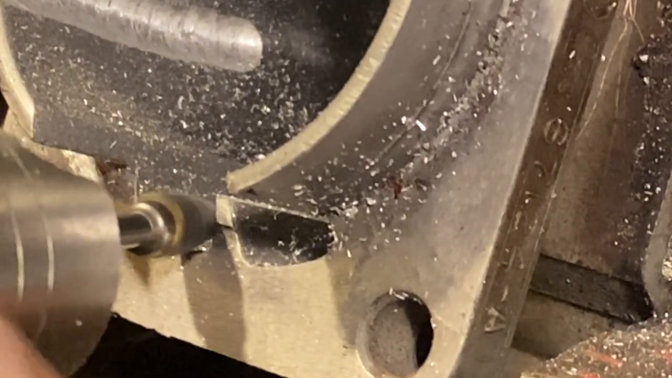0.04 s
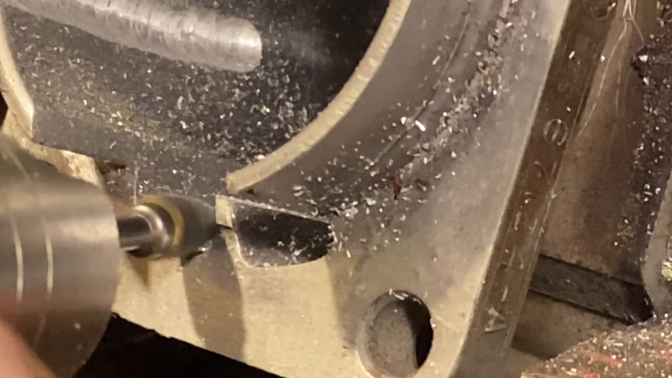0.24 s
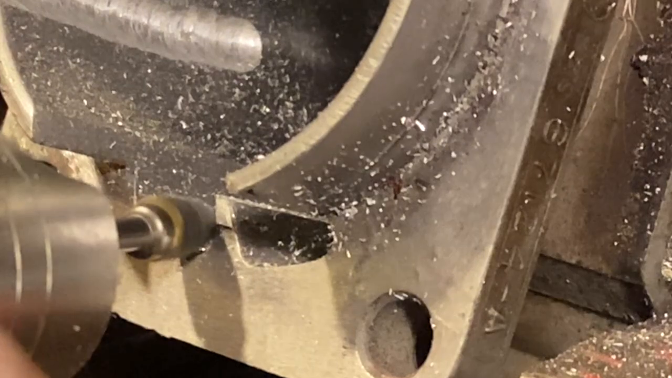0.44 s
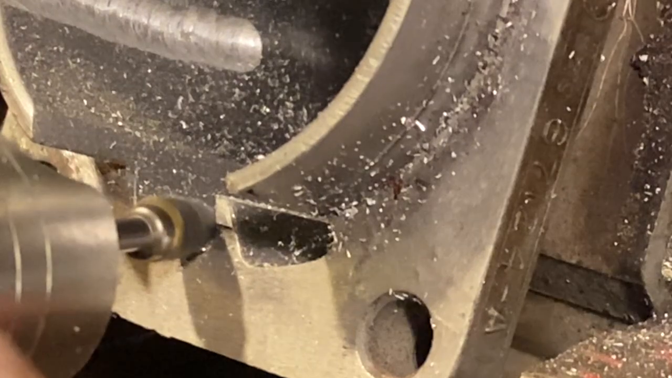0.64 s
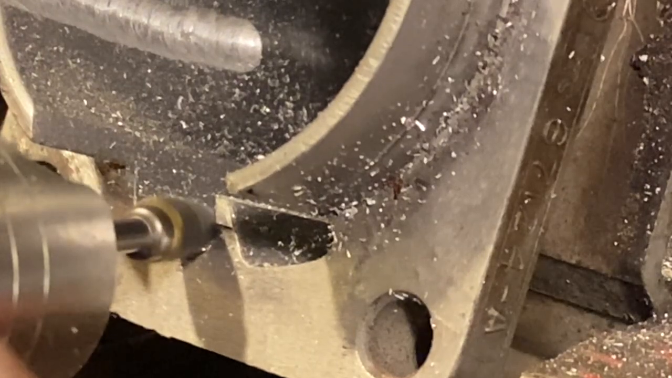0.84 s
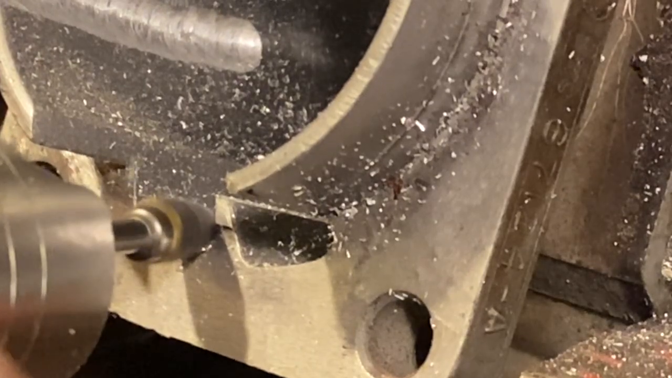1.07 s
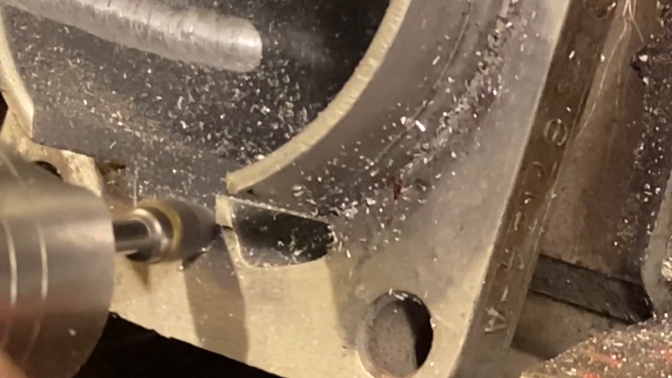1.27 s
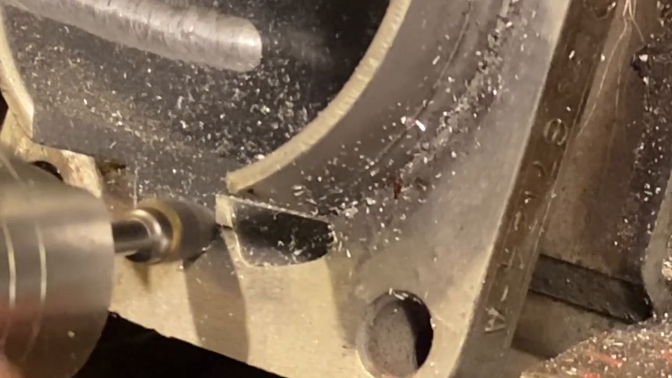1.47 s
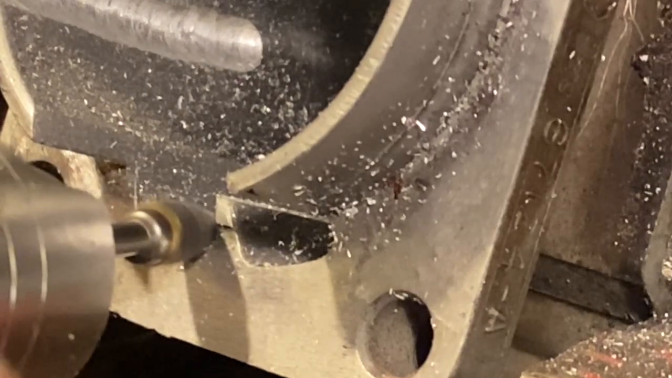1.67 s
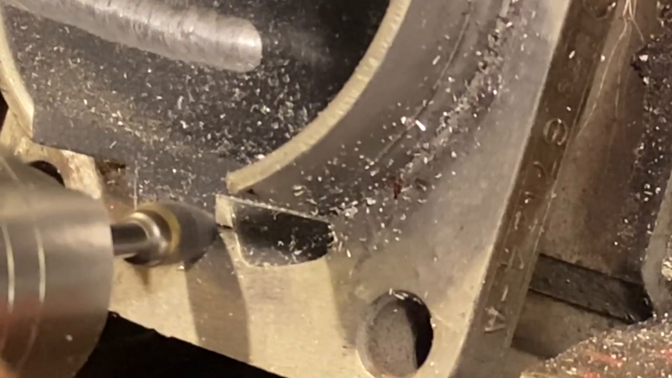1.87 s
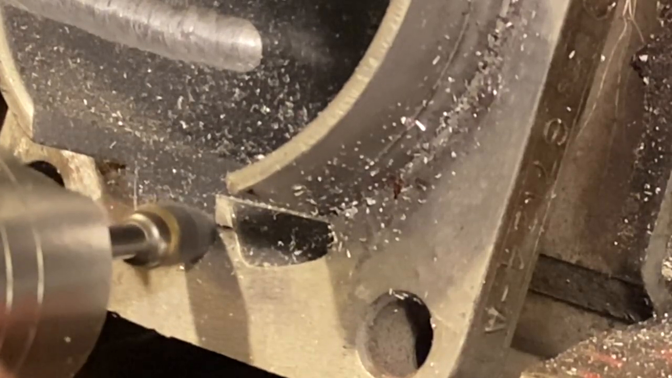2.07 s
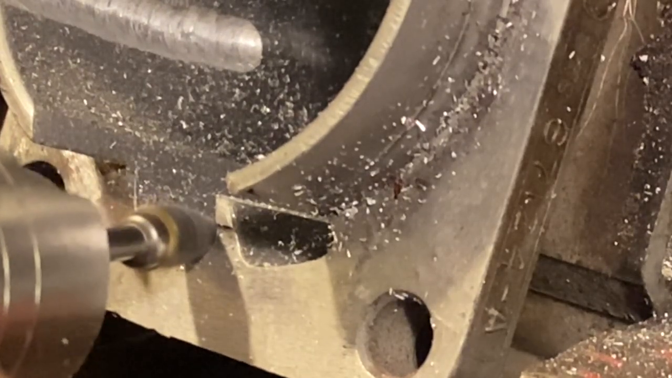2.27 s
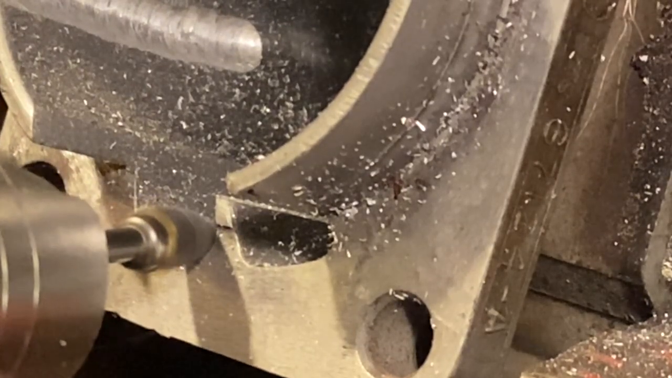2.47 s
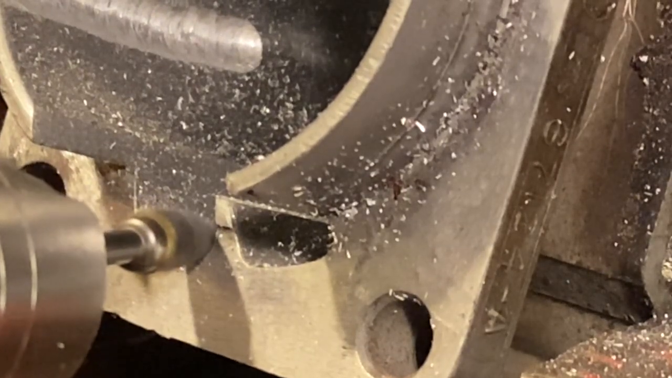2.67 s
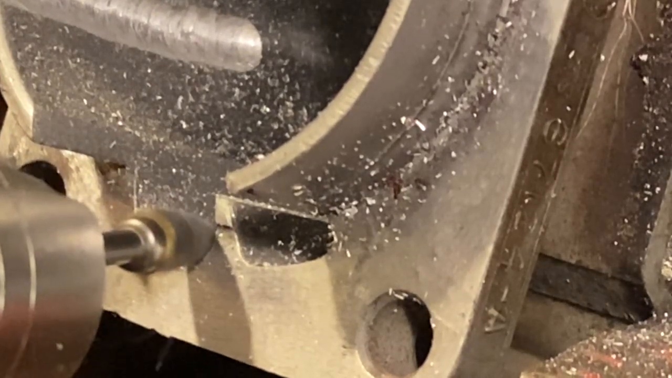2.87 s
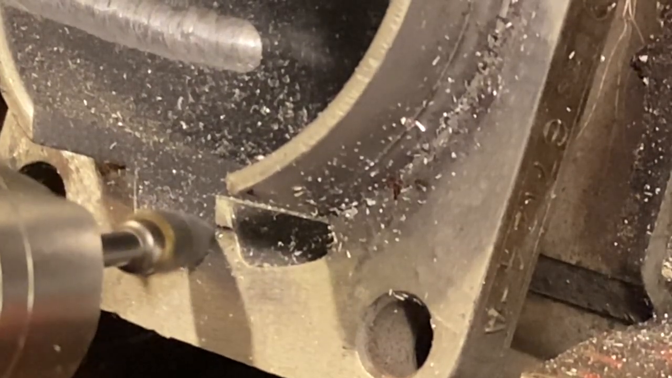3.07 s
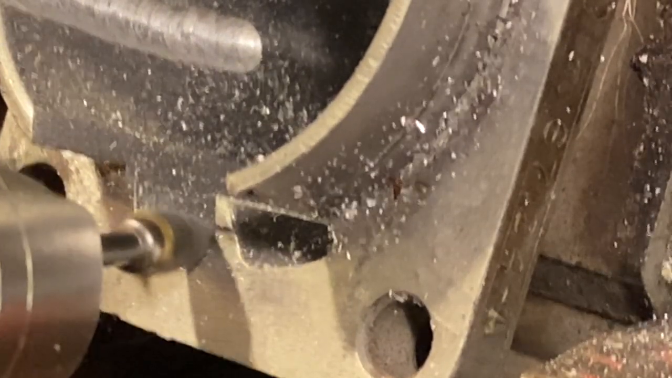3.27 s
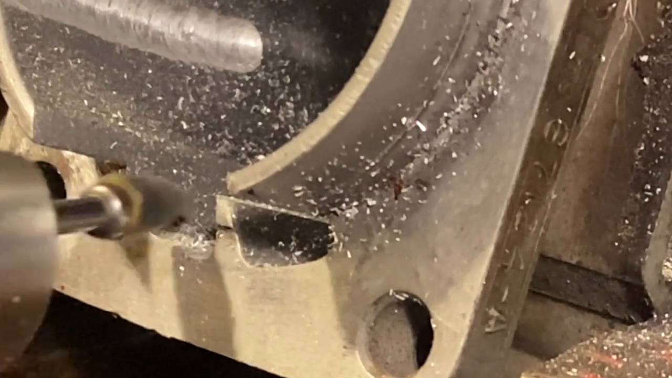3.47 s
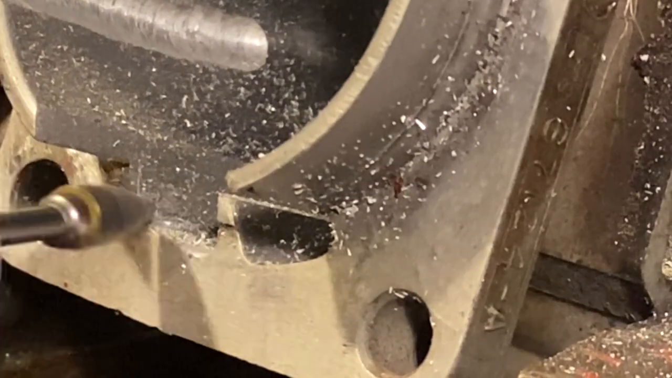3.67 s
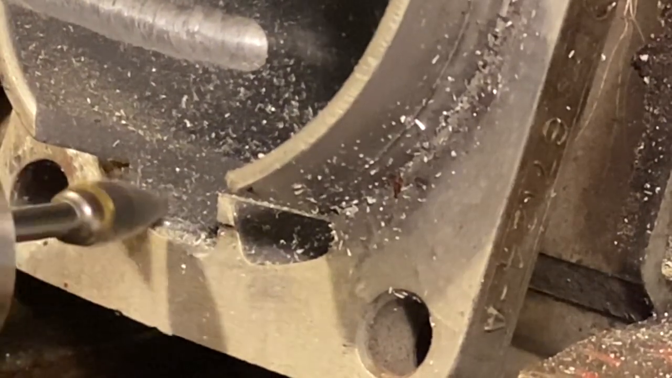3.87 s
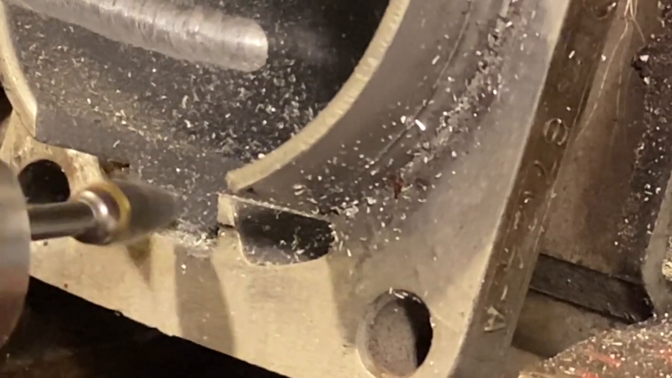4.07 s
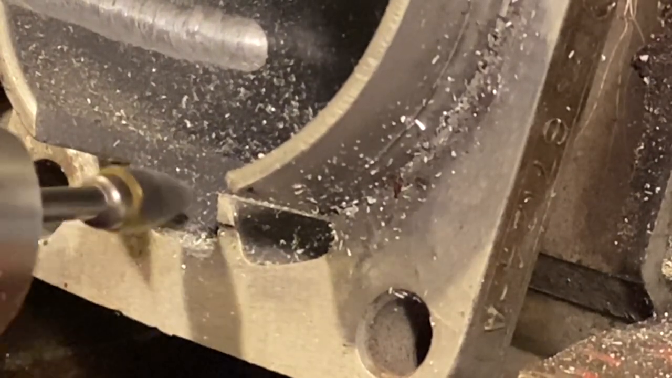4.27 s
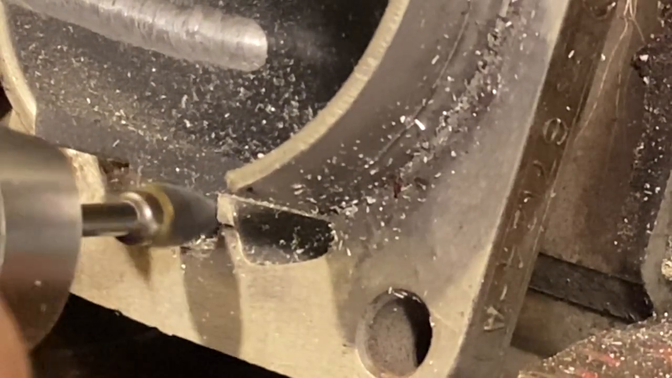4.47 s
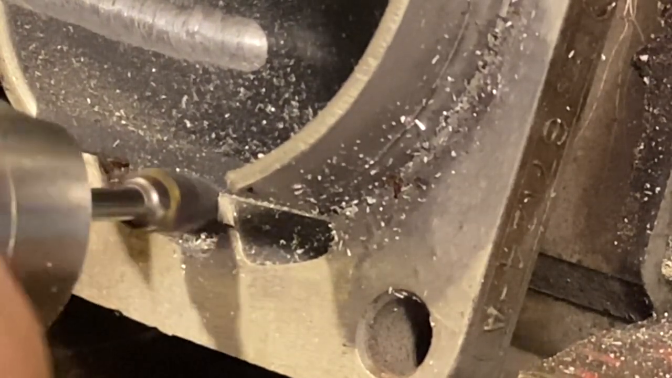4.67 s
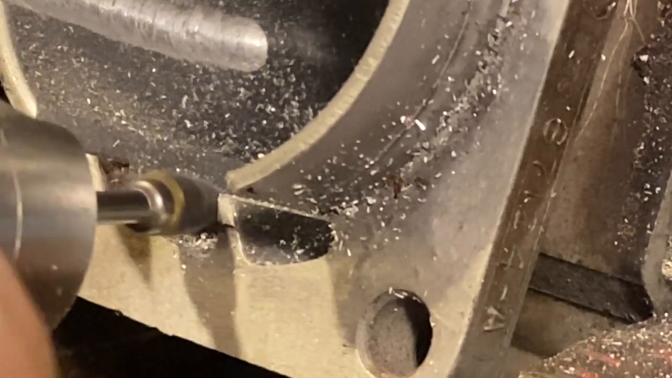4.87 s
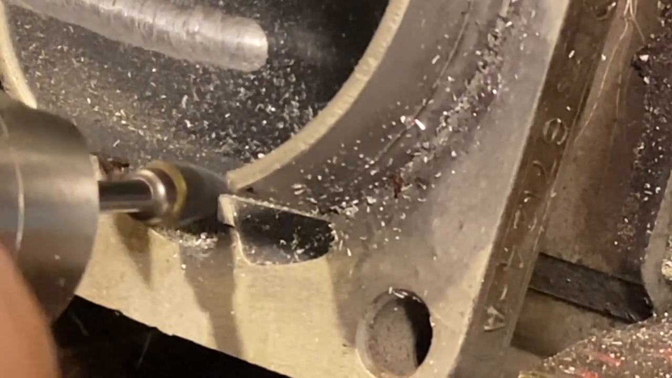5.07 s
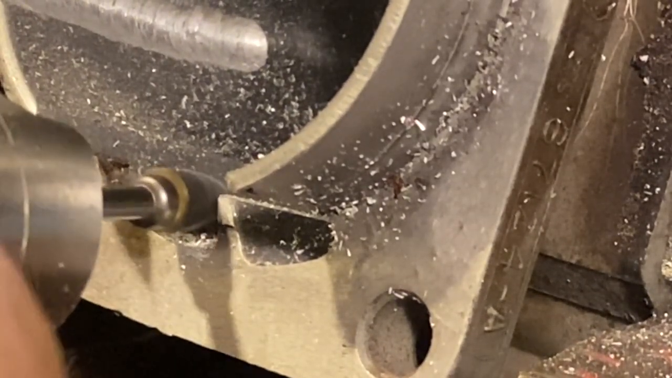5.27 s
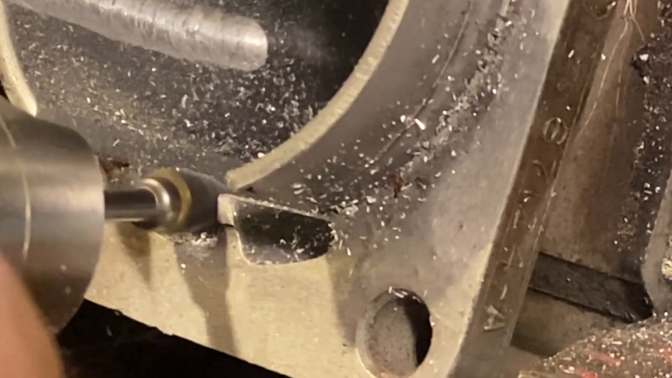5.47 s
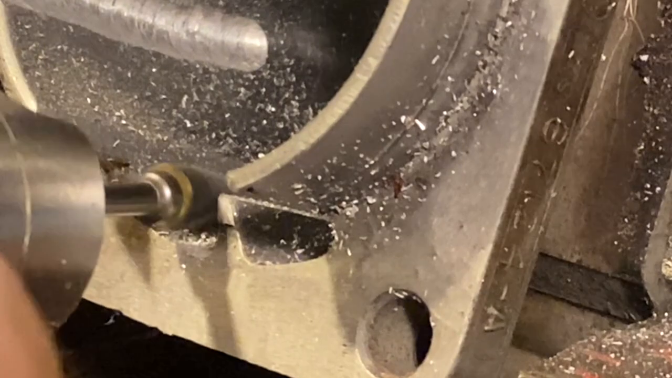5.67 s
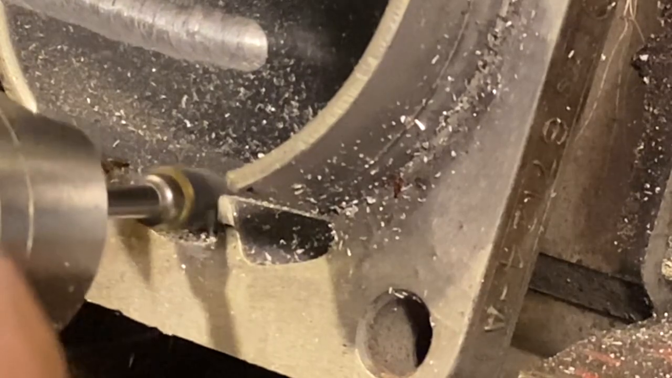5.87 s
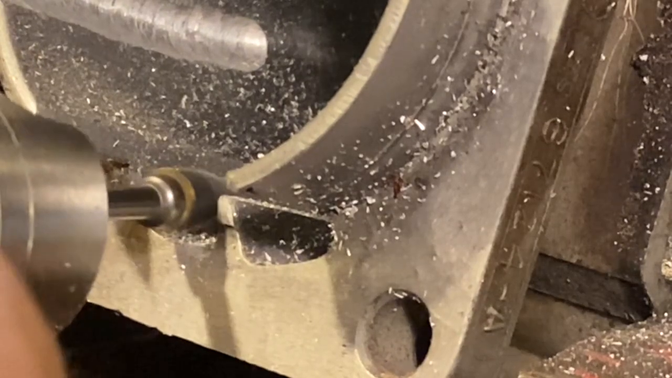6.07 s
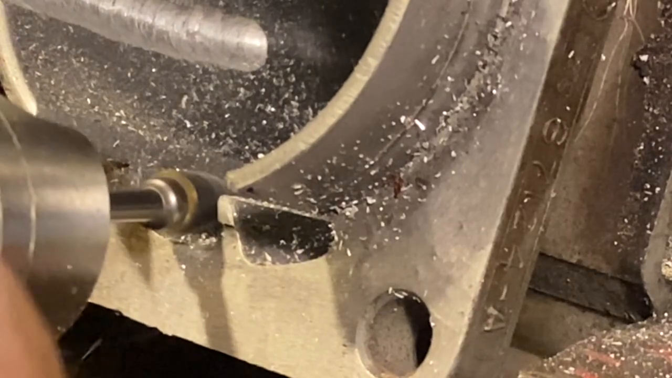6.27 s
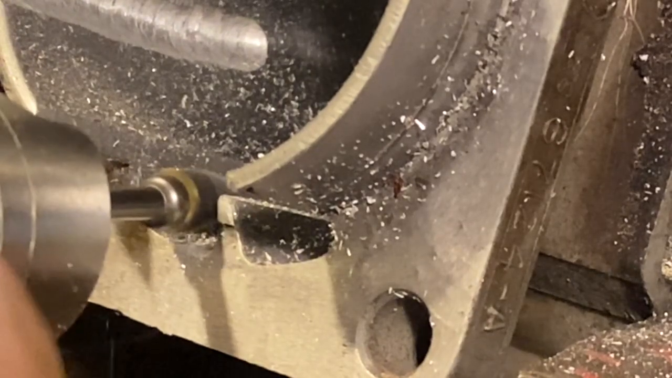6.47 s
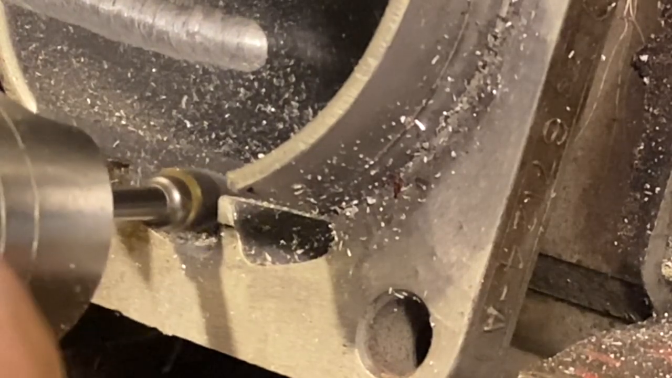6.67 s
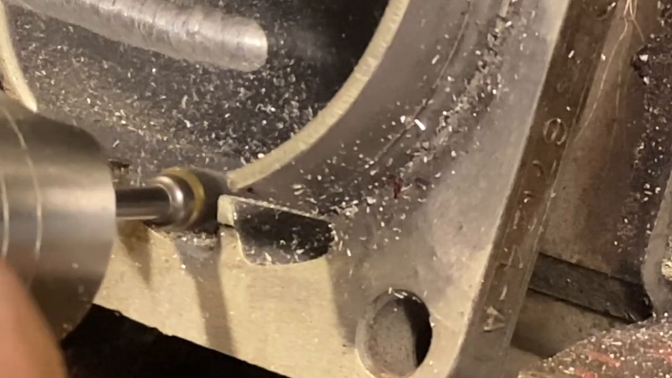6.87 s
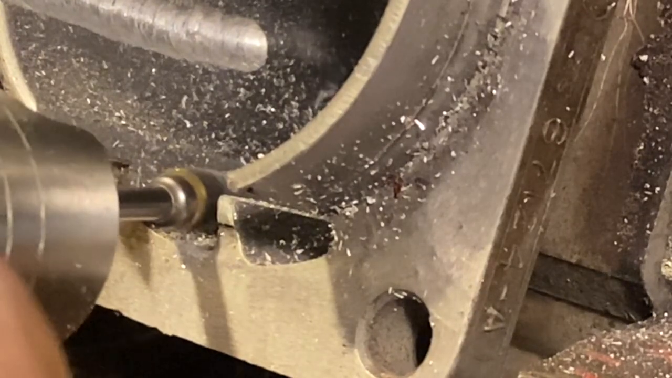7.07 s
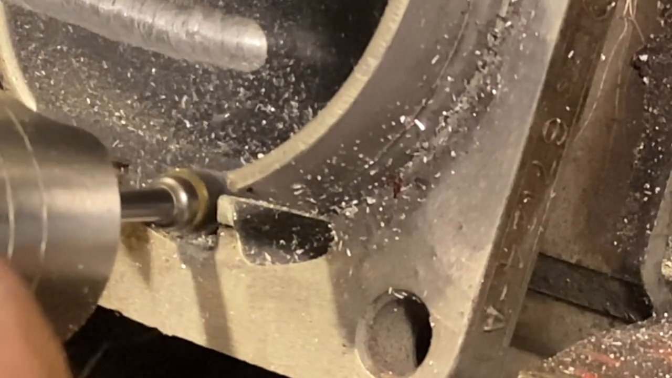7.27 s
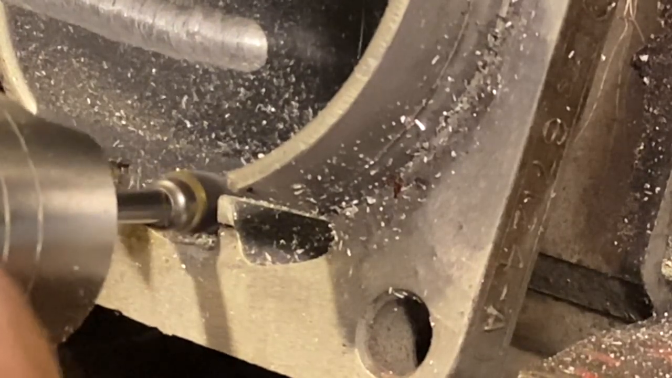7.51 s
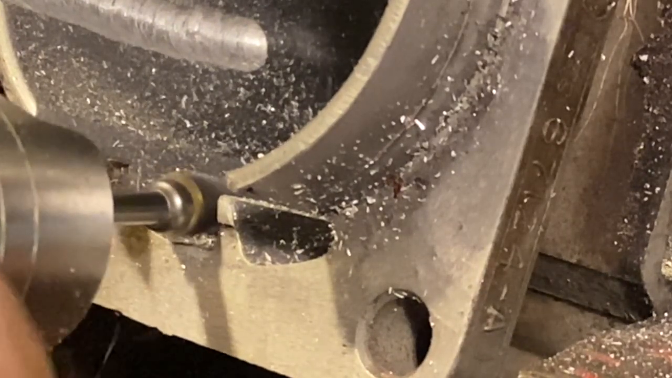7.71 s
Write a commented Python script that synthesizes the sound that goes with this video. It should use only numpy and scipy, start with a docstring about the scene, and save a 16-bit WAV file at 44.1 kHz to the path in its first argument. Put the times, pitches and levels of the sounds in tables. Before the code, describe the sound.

Close up, a small electric grinder's spinning burr cuts a metal casting with a harsh, rough, ringing buzz. After three seconds it lifts off, leaving the motor's airy whirr and steady whine over a low hum. A lighter, uneven touch follows, then a full second cut. Faint workshop rumble lies beneath. Close stereo microphones, little room.

```python
"""A harsh, ringing grind on metal; it stops for a free-running whirr, then a light touch and a second cut. An
electric die grinder cuts a casting: once a turn the off-centre burr strikes, ringing shank and casting.
Brushes, bearings and fan give pulsing filtered noise, shaft orders give tones, unbalance gives the hum. A low
workshop rumble and mains hum lie beneath; left and right differ in phase and balance by band."""
import sys
import numpy as np
from scipy import signal
from scipy.fft import rfft, irfft
from scipy.io import wavfile
from scipy.ndimage import uniform_filter1d

SR = 44100
rng = np.random.default_rng(int(sys.argv[2]) if len(sys.argv) > 2 else 0)


def master_out(mix):
    """Clip the mix to full scale and print it as 16-bit PCM to the path in sys.argv[1]."""
    frames = np.transpose(np.atleast_2d(mix))
    ceiling = np.clip(frames, -1, 1)
    pcm = np.round(ceiling * 32767).astype(np.int16)
    wavfile.write(sys.argv[1], SR, pcm)


N = 341334
T = np.arange(N) / SR

# Shaft speed, lower under load. Each row: time in seconds, speed in turns per second.
SHAFT_SPEED = [(0, 350), (1, 350.3), (1.5, 349.8), (3.3, 349.4), (3.8, 351.2), (4.4, 353.1), (4.8, 353.4),
               (7.74, 353.3)]
# Weakening of every second strike as the burr bounces. Each row: time in seconds, share 0-1.
BOUNCE_SHARE = [(0, 0.52), (.5, 0.57), (.8, 0.46), (3.3, 0.17), (4.7, 0.23), (5.3, 0.71), (7.74, 0.67)]
# Teeth that catch hard. Each row: time in seconds, level in dB over the running force.
TOOTH_CATCHES = [(0.567, 33), (.748, 29), (1.02, 31.5), (1.068, 32), (1.418, 27), (1.956, 31), (2.527, 26),
                 (2.812, 37.5), (2.99, 34), (3.034, 33), (4.814, 40), (5.247, 34), (6.165, 32), (6.853, 33),
                 (7.222, 28), (7.332, 33), (7.644, 27), (7.679, 37)]
# Broad response of the casting. Each row: frequency in Hz, then density in dB per Hz (relative)
# in the first cut, light touch, second cut.
CASTING_RESPONSE = [(402, -21, -19, -18), (1260, -6, -6, -8.5), (1840, -0.5, 4, -2), (2240, -3.5, 8, -3),
                    (3190, 2.5, 6.5, -1.5), (3360, -5.5, 2, -6), (4390, -1.5, 8, -1.5),
                    (5300, 2.5, 7.5, -0.5), (6700, -4.5, 2, -5), (7800, 2.5, 9, -2.5), (8200, -5.5, -4, -6),
                    (11100, -4.5, -10, -3.5), (11270, -5.5, -5.5, -5.5), (16200, 2, 0.5, 1)]
# Ringing of casting and burr. Each row: frequency in Hz, width in Hz, then level in dB over the
# broad response in the first cut, light touch, second cut.
RING_MODES = [(2445, 50, 7, 7, 7), (2800, 60, 6, 3, 4), (4375, 70, 8, 6, 9), (4532, 50, 10, 8, 10),
              (6190, 280, 12, 14, 15), (6768, 26, 17, 17, 19), (7030, 35, 5, 6, 9), (7180, 45, 8, 8, 10),
              (7740, 120, 5, 5, 7), (8860, 40, 7, 6, 8), (9550, 45, 10, 6, 9), (9775, 55, 13, 6, 6),
              (11250, 160, 17, 20, 8), (11870, 80, 6, 3, 3), (13070, 60, 11, 8, 11), (13600, 90, 4, 6, 10),
              (14070, 130, 12, 10, 13), (14500, 100, 10, 12, 16), (15080, 50, 6, 6, 10)]
# Low shaking of tool and work. Each row: multiple of shaft speed, then level in dB over the casting
# in the first cut, light touch, second cut; half orders are cut further by BOUNCE_SHARE.
SHAKE_ORDERS = [(.5, -14.5, -10.5, -12.5), (1.5, -17, -14, -15), (2, -20.5, -23, -27), (3, -12, -34, -39),
                (4, -15.5, -36, -19), (5, -10, -15, -8), (6, -15, -10.5, -12.5)]
# Motor tones. Each row: multiple of shaft speed, mean amplitude in dB.
WHINE_ORDERS = [(.5, -61.5), (2, -62.5), (4, -59), (22, -46), (44, -70)]
# Rush of brushes and bearings. Each row: frequency in Hz, density in dB per Hz (relative).
RUSH_SPECTRUM = [(400, -8), (1000, -2.5), (2000, -7.5), (3300, -12), (3950, -7), (4300, -5), (4750, 0.5),
                 (5700, -4), (6230, 2), (6800, -15), (8000, -3.5), (10800, -6), (11200, -2), (11500, -6.5),
                 (15000, -5.5)]
# Workshop rumble. Each row: frequency in Hz, density in dB per Hz (relative).
RUMBLE_SPECTRUM = [(30, -23), (60, -14), (110, 1.5), (165, 4.5), (250, -1.5), (330, -16.5), (480, -3),
                   (700, -18), (1000, -8), (1500, -24)]
# Left and right channels. Each row: frequency in Hz, lead of the right in half turns, likeness 0-1, # left
# minus right in dB.
CHANNEL_PAIR = [(100, 0, .93, 0), (190, 0, .95, 0), (300, .08, .65, -3), (450, -.2, .55, -3),
                (700, -.1, .75, 2.5), (1000, -.55, .45, 3), (1200, -.85, .6, -4), (1400, -.45, .95, -2),
                (1780, -.5, .85, 3), (2050, 0, 1, 0), (5550, 0, 1, 0), (5850, .08, 1, 0),
                (6250, 0, 1, 0)]
# Whistling air. Each row: multiple of shaft speed, width in Hz, level in dB (relative).
FAN_BANDS = [(11.3, 350, -11), (20.3, 300, 0), (21.1, 380, 0), (20.6, 150, -4), (21.9, 140, -3),
             (31.8, 200, -10), (43.4, 200, -8), (44.1, 260, -7)]
# Stages of contact: first cut, light touch, second cut. Each row: start in seconds, end in seconds,
# fine chips in dB in 9.5-12.5 kHz at the usual bite, share of the bite's dB swings the chips follow.
CONTACT_STAGES = [(0, 3.32, -42, 1.1), (4.53, 5.4, -41.5, .1), (5.401, 7.74, -47.5, 1.3)]
# Bite of the burr. Each row: time in seconds, casting level in dB in 1.5-5 kHz,
# shank ring in dB over the casting.
BURR_BITE = [(0, -35.5, 11), (.2, -36.5, 13), (.4, -33.5, 13.5), (1.5, -35.5, 14), (2.2, -39, 14),
             (2.45, -36.5, 14), (2.75, -37.5, 13), (3.05, -36.5, 14), (3.23, -39, 16.5), (3.29, -46, 10),
             (3.33, -61, -8), (4.53, -50.5, 7), (4.64, -47, -1), (4.72, -40.5, 13), (4.93, -39, -2),
             (5.03, -39, 12), (5.17, -39, 5.5), (5.45, -35, 11), (5.62, -34.5, 10), (5.9, -40, 15.5),
             (6.1, -37, 11), (6.68, -34, 11), (6.95, -37, 10.5), (7.22, -34.5, 11.5), (7.6, -39.5, 12.5),
             (7.74, -37, 10.5)]
# The tool moves before the microphones. Each row: time in seconds, motor rush in dB,
# lead of the right hum over the left in radians, hum left minus right in dB.
TOOL_PLACE = [(0, -38.5, 2.35, -7), (.8, -42, 2.59, -3.5), (2.8, -43, 1.62, -6), (3.15, -38, 2.1, -6),
              (3.35, -41, 3.54, -3.5), (3.75, -39.5, 4.16, -3), (4.1, -37, 4.7, -4), (4.5, -38, 4.3, -4),
              (5.3, -37, 3.48, 1.5), (6.7, -37, 3.62, 0.5), (7.74, -35.5, 3.26, -2)]

USUAL_BITE_DB = -36
SKIPS_PER_S = 63  # centre of a wandering rate
SHANK_HZ, LOOSE_DROP_HZ, SEATS_S, SEATING_S = 5862, 152, .4, .09  # rings lower until the burr seats
LIFT_S, LIFT_SHARE = 0.011, 0.45  # the burr rides off the work just before a tooth catches
FAN_DB, FAN_MUFFLED_DB = -1.5, -5.5  # over the rush; added while the tool is down in the work
HUM_DB, HUM_FOLLOWS = -47.5, 0.21  # rms with the rush at -40 dB; share of the rush's dB swings followed
RUMBLE_DB, MAINS_HZ, MAINS_DB = -54, 120, -67
# half-turn flips of the right side in the treble, less like the left while turning
FLIP_HZ, FLIP_EVERY_HZ, FLIP_WIDTH_HZ, FLIP_UNLIKE = 7907, 2060, 1440, 0.23
EDGE_HZ = 15735


def gain_of(db):
    """Decibels to amplitude."""
    return 10 ** (np.asarray(db) / 20)


def evened(x):
    """Scales to rms 1."""
    return x / np.sqrt(np.mean(x ** 2) + 1e-20)


def curve(rows, at, column=1):
    """One column of a table, joined by straight lines."""
    rows = np.asarray(rows, float)
    return np.interp(at, rows[:, 0], rows[:, column])


TURNS = np.cumsum(curve(SHAFT_SPEED, T)) / SR


def wander(lo_hz, hi_hz, count=30):
    """Slow chance of rms 1: sines of random phase between two rates."""
    t = T[::64]
    slow = sum(np.sin(2 * np.pi * (f * t + rng.random())) for f in np.geomspace(lo_hz, hi_hz, count))
    return np.interp(T, t, evened(slow))


def coloured(x, db_at):
    """Minimum-phase filter whose level in dB is db_at(Hz), then rms 1."""
    log_gain = np.log(gain_of(db_at(abs(np.fft.fftfreq(8192, 1 / SR)))))
    taps = np.fft.ifft(np.exp(np.conj(signal.hilbert(log_gain)))).real[:4096]
    return evened(signal.oaconvolve(x, taps)[:N])


def filtered(x, edge_hz, kind):
    """Fourth-order Butterworth filter."""
    return signal.sosfilt(signal.butter(4, edge_hz, kind, fs=SR, output="sos"), x)


def band_evened(x, lo_hz, hi_hz):
    """Scales x so that one band of it has rms 1."""
    return x / np.std(filtered(x, [lo_hz, hi_hz], "band"))


def resonate(x, hz, width_hz):
    """Resonance on a moving pitch: shifts hz down to zero, smooths, shifts back."""
    turn = np.exp(2j * np.pi * np.cumsum(hz) / SR)
    r = np.exp(-np.pi * width_hz / SR)
    return 2 * (turn * signal.lfilter([1 - r], [1, -r], x / turn)).real


def order(m, blur_rad):
    """Sine at a multiple of the shaft speed, its phase drifting by blur_rad rms."""
    return np.sin(2 * np.pi * m * TURNS + blur_rad * wander(.5, 25, count=10))


def touching(start_s, end_s):
    """1 while the burr is in the metal, with soft edges."""
    return uniform_filter1d(1. * (T >= start_s) * (T <= end_s), size=1500, mode="nearest")


def strikes():
    """Force on the work: once a turn a sharp knock and a burst of tooth clicks, over steady scraping."""
    turn = TURNS.astype(int)
    size, late = rng.standard_normal((turn[-1] + 2, 2)).T
    phase = (TURNS - .05 * late[turn]) % 1
    bounce = np.clip(curve(BOUNCE_SHARE, T), 0, 1) * (turn % 2)
    blow = (1 - bounce) * gain_of(2 * size[turn])
    clicks = evened((0.23 + blow * np.exp(-phase / 0.37)) * rng.standard_normal(N))
    high_spot = np.floor(TURNS - .4 + .018 * late[turn] + .03 * wander(.5, 25))
    knocks = evened(blow * (np.diff(high_spot, prepend=0) > 0))
    # the burr digs in, then rides up
    skips = np.cumsum(SKIPS_PER_S * gain_of(3.5 * wander(4, 60))) / SR % 1
    chatter = gain_of(1.0 * wander(4, 50)) * (3.0 + np.exp(-skips / 0.69))
    return evened(chatter * (clicks + 0.74 * (knocks - knocks.mean())))


def tooth_catches():
    """Single impulses where teeth catch hard."""
    caught = np.zeros(N)
    time_s, db = np.transpose(TOOTH_CATCHES)
    caught[np.round(time_s * SR).astype(int)] = gain_of(db)
    return caught


def lifted(force, caught):
    """Force eased for LIFT_S ahead of each catch, as the burr rides off the work."""
    lift = round(LIFT_S * SR)
    ahead = lift * uniform_filter1d(1. * (caught > 0), size=lift, origin=-(lift // 2))
    return force * (1 - LIFT_SHARE * np.clip(ahead, 0, 1))


def shank_ring(force, caught):
    """Shank resonance driven by strikes and catches; wide swings rub on the work and are damped harder."""
    loose_hz = LOOSE_DROP_HZ * np.exp(-np.maximum(T - SEATS_S, 0) / SEATING_S)
    hz = SHANK_HZ - loose_hz + 8 * wander(1.1, 33)
    plucks = force + resonate(caught, hz, 550)  # each pluck lasts about a millisecond
    broad = resonate(resonate(plucks, hz, 167), hz, 162)
    shank = evened(resonate(plucks, hz, 70) + 0.62 * broad)
    swing = abs(uniform_filter1d(shank ** 2, size=30))
    return evened(shank / (1 + swing / 5) ** 0.31)


def casting_ring(force, stage):
    """Force through the casting's broad response and its ringing modes: body and fine chips."""
    def response_db(hz):
        peaks = sum(gain_of(r[2 + stage]) ** 2 / (1 + (2 * (hz - r[0]) / r[1]) ** 2) for r in RING_MODES)
        return curve(CASTING_RESPONSE, hz, column=1 + stage) + 10 * np.log10(1 + peaks)
    work = coloured(force, response_db)
    body = band_evened(filtered(work, 8300, "low"), 1500, 5000)
    chips = band_evened(filtered(work, 8300, "high"), 9500, 12500)
    return body, chips


def shaking(pressing):
    """Tool and work shake at low shaft orders; half orders come from the weak second strike."""
    out = np.zeros(N)
    for m, *db in SHAKE_ORDERS:
        share = curve(BOUNCE_SHARE, T) if m % 1 else 1
        level = share * (gain_of(db) @ np.array(pressing)) * gain_of(2.85 * wander(.8, 12, count=10))
        out += level * order(m, blur_rad=0.21 + 0.15 * m + 0.72 * (m % 1 > 0))
    return out


def cutting():
    """Strikes ring shank and casting and shake the tool, each level following the bite."""
    caught = tooth_catches()
    force = lifted(strikes(), caught)
    shank = shank_ring(force, caught)
    bite_db = curve(BURR_BITE, T)
    shank_gain = gain_of(curve(BURR_BITE, T, column=2))
    out, pressing = np.zeros(N), []
    for stage, (start_s, end_s, chips_db, follows) in enumerate(CONTACT_STAGES):
        body, chips = casting_ring(force, stage)
        contact = touching(start_s, end_s)
        press = contact * gain_of(bite_db)
        fine = contact * gain_of(chips_db + follows * (bite_db - USUAL_BITE_DB))
        out += press * shank_gain * shank + press * body + fine * chips
        pressing.append(uniform_filter1d(press, size=3000))
    return out + shaking(pressing)


def motor_pulse():
    """Noise level that pulses with the shaft and ticks at random, about 300 times a second."""
    hits = gain_of(3.9 * rng.exponential(1, N).clip(0, 3)) * (rng.random(N) < 300 / SR)
    ticks = signal.lfilter([1], [1, -.985], hits)
    pulse = 1 + 0.43 * np.cos(2 * np.pi * TURNS) + 0.15 * np.cos(4 * np.pi * TURNS) + 0.088 * ticks
    return pulse * gain_of(1.17 * wander(4, 60))


def fan_whistle(air):
    """Noise through paired resonances at multiples of the shaft speed."""
    speed = curve(SHAFT_SPEED, T)
    bands = 0
    for m, width_hz, db in FAN_BANDS:
        once = resonate(air, m * speed, width_hz)
        bands = bands + gain_of(db) * resonate(once, m * speed, width_hz)
    return evened(bands)


def motor_whine():
    """Shaft orders of wavering level, the high ones more blurred."""
    return sum(gain_of(db + 0.8 * wander(0.95, 31, count=10)) * order(m, blur_rad=0.12 + 0.022 * m)
               for m, db in WHINE_ORDERS)


def motor():
    """Rush of brushes and bearings, fan whistle muffled in the work, and whine."""
    rub, air = motor_pulse() * rng.standard_normal((2, N))
    rush = coloured(rub, lambda hz: curve(RUSH_SPECTRUM, hz))
    down = sum(touching(start_s, end_s) for start_s, end_s, *_ in CONTACT_STAGES)
    fan = gain_of(FAN_DB + FAN_MUFFLED_DB * down) * fan_whistle(air)
    return gain_of(curve(TOOL_PLACE, T)) * (rush + fan) + motor_whine()


def hum():
    """Shaft unbalance: one tone whose phase and balance between the microphones shift as the tool moves."""
    right_only, halves = np.array([[0], [1]]), np.array([[.5], [-.5]])
    drift_rad = 0.07 * np.array([wander(2.4, 30), wander(1.5, 30)])
    lead_rad = curve(TOOL_PLACE, T, column=2) * right_only + drift_rad
    level_db = HUM_DB + HUM_FOLLOWS * (curve(TOOL_PLACE, T) + 40)
    level_db = level_db + curve(TOOL_PLACE, T, column=3) * halves
    return np.sqrt(2) * gain_of(level_db) * np.sin(2 * np.pi * TURNS + lead_rad)


def workshop():
    """Room rumble as coloured noise, and transformer hum as a steady sine."""
    rows = np.array(RUMBLE_SPECTRUM, float)
    log_hz = np.log(rows[:, 0])
    rumble = coloured(rng.standard_normal(N), lambda hz: np.interp(np.log(hz + 1), log_hz, rows[:, 1]))
    return gain_of(RUMBLE_DB) * rumble + gain_of(MAINS_DB) * np.sin(2 * np.pi * MAINS_HZ * T)


def spread(x):
    """Two channels: a phase lead and balance by band, and a reverberant tail mixed into the right one only."""
    echoes = rng.standard_normal(12000) * np.exp(-np.arange(12000) / 2500)
    direct = rfft(x)
    late = rfft(signal.oaconvolve(x, echoes / np.linalg.norm(echoes))[:N])
    hz = np.fft.rfftfreq(N, 1 / SR)
    lead, same, tilt_db = (curve(CHANNEL_PAIR, hz, column=c) for c in (1, 2, 3))
    flips_hz = FLIP_HZ + FLIP_EVERY_HZ * np.arange(4)[:, None]
    turned = np.clip((hz - flips_hz) / FLIP_WIDTH_HZ + .5, 0, 1).sum(axis=0)
    lead = lead + turned  # half turns
    same = np.clip(same - FLIP_UNLIKE * np.sin(np.pi * turned) ** 2, 0, 1)
    right = same * direct * np.exp(1j * np.pi * lead) + np.sqrt(1 - same ** 2) * late
    return irfft(np.array([direct * gain_of(tilt_db / 2), right * gain_of(-tilt_db / 2)]), N)


def scene():
    """Tool, work and room, spread over two channels."""
    return spread(cutting() + motor() + workshop()) + hum()


def record(dry):
    """Small microphones lose the deep bass; then the band limit."""
    thin = filtered(dry, 58, "high")
    taps = signal.firwin(2047, EDGE_HZ, window=("kaiser", 10), fs=SR)
    return signal.oaconvolve(thin, taps[None], "same")


dry = scene()
out = record(dry)
master_out(out)
```